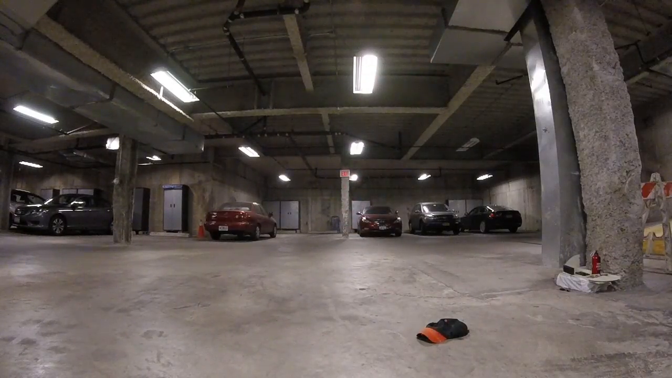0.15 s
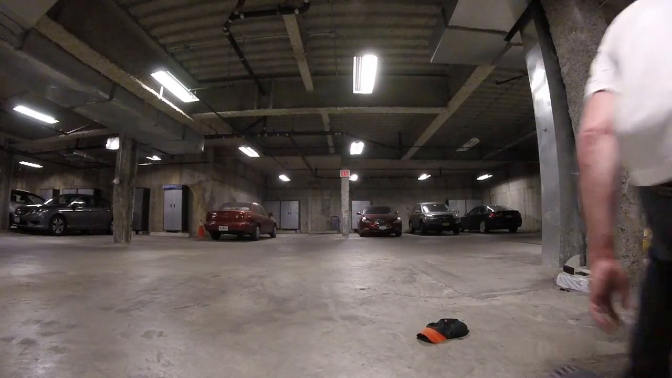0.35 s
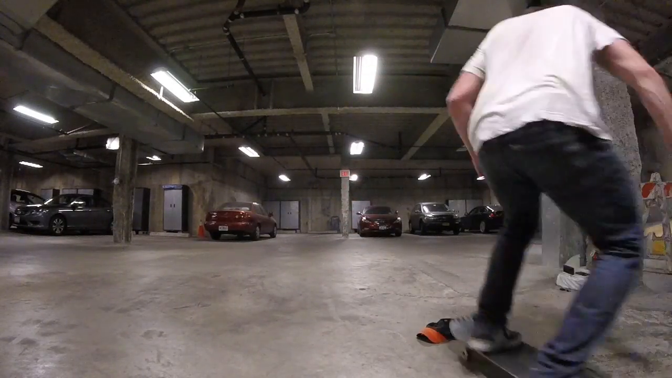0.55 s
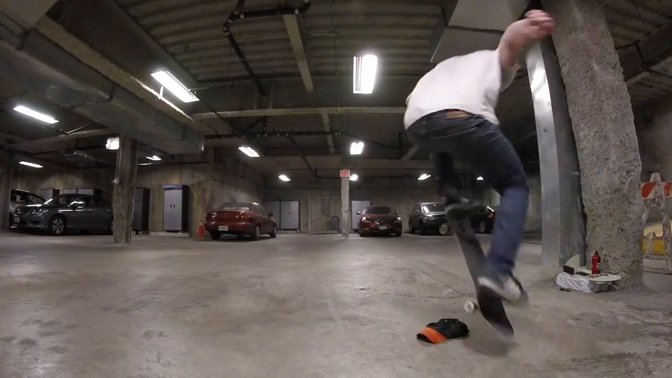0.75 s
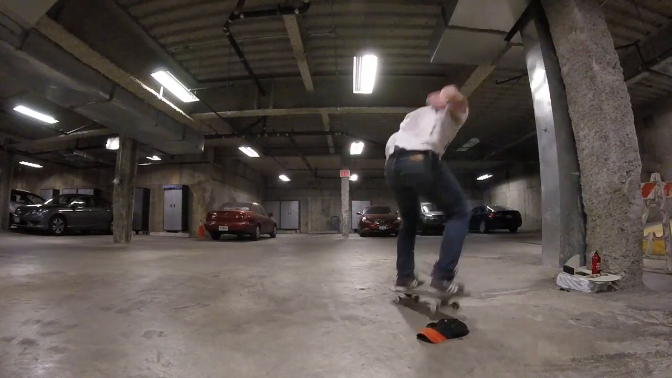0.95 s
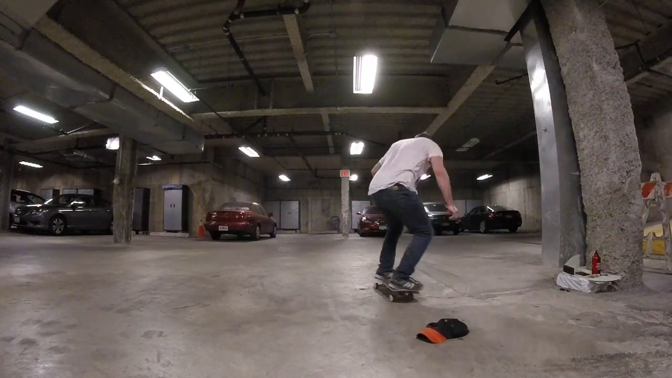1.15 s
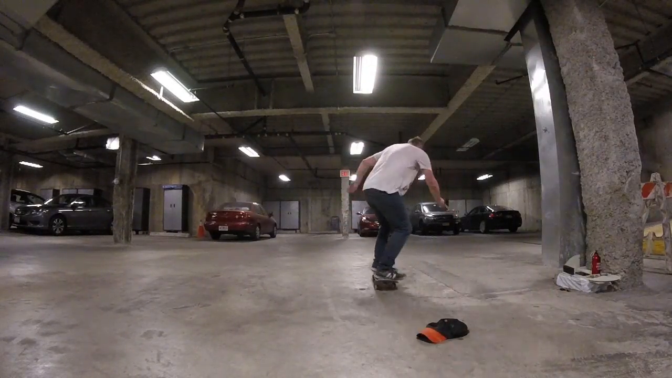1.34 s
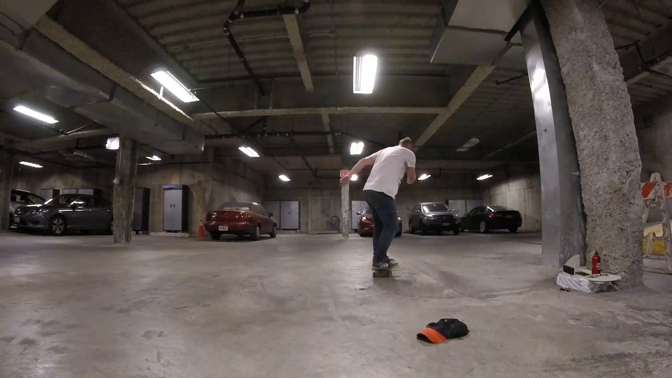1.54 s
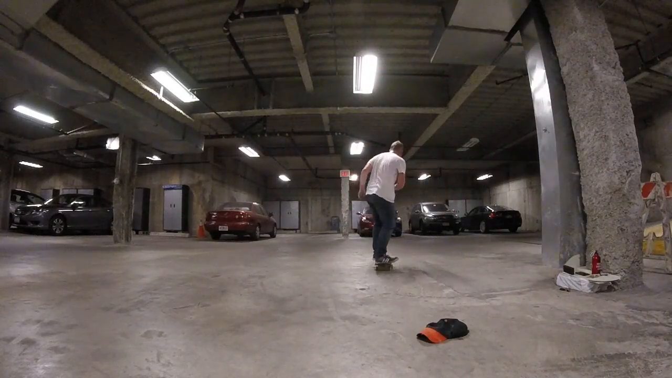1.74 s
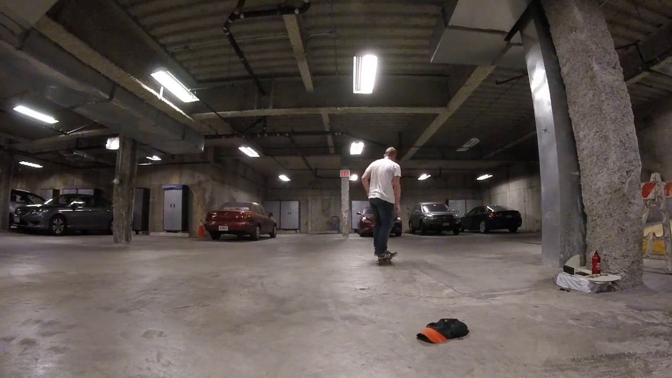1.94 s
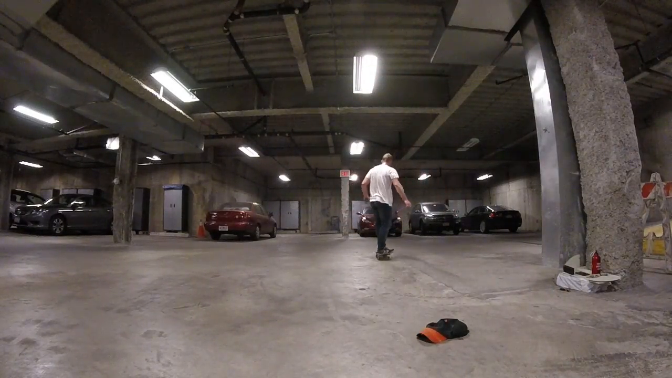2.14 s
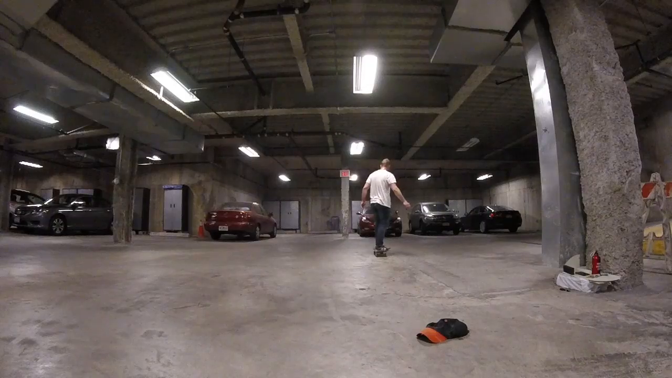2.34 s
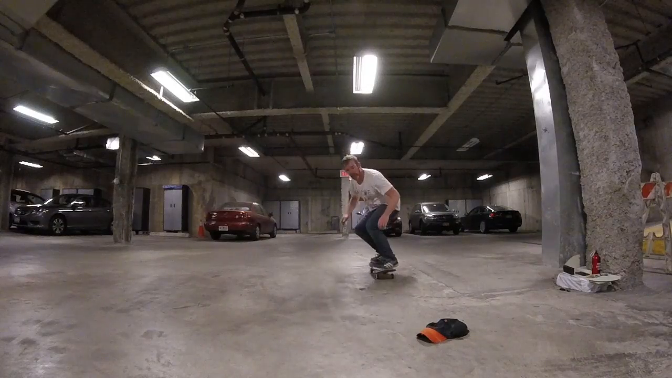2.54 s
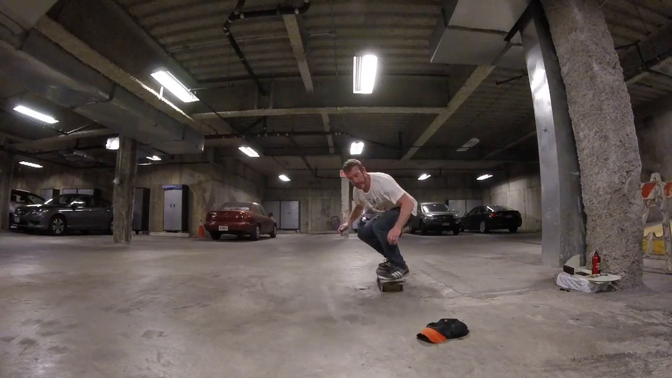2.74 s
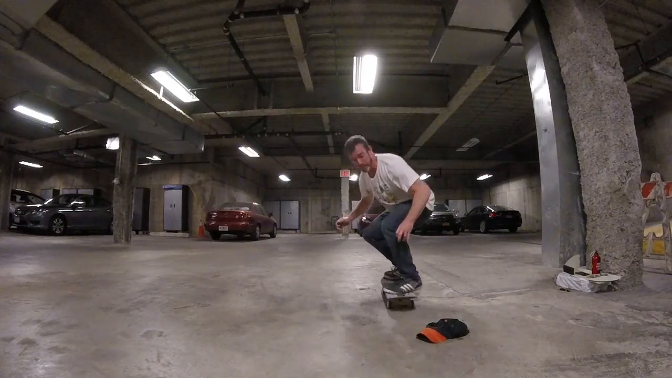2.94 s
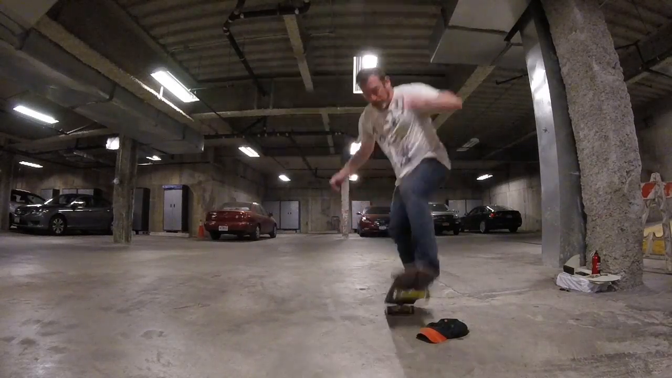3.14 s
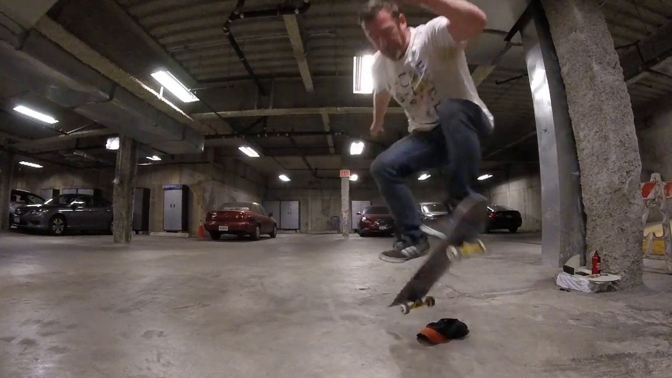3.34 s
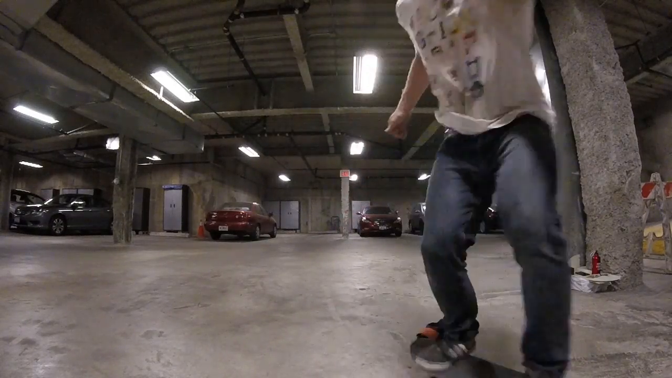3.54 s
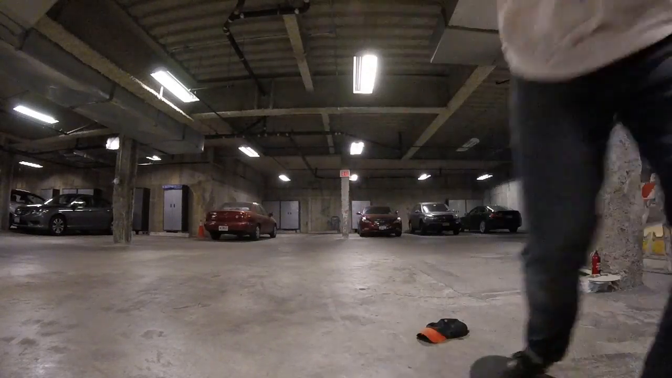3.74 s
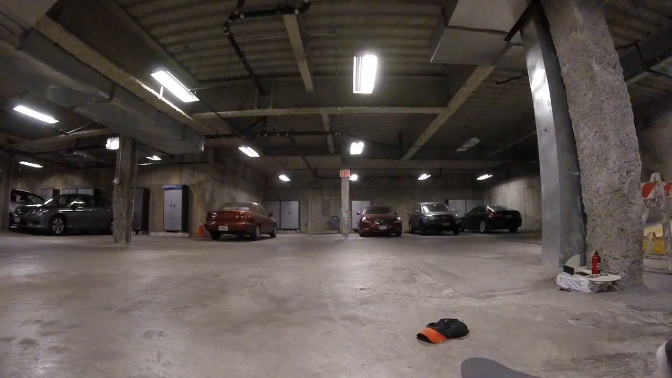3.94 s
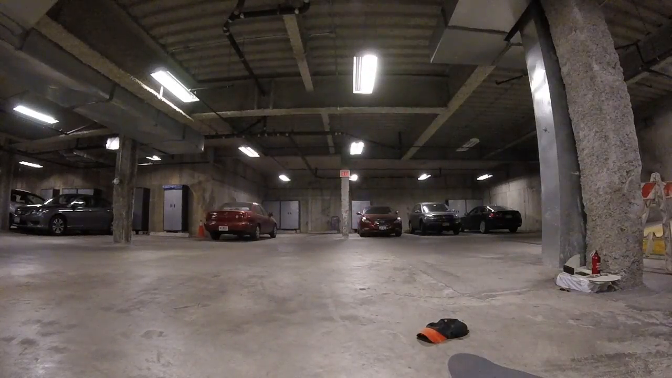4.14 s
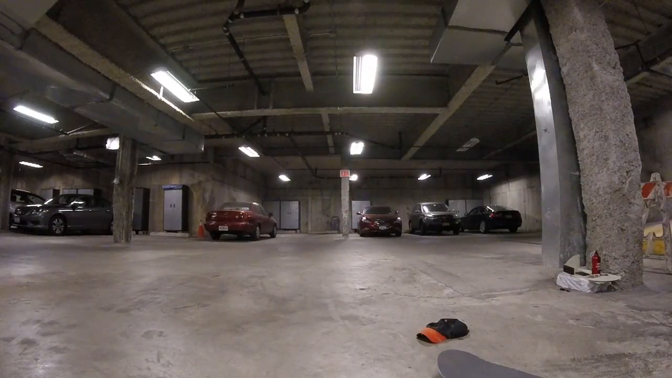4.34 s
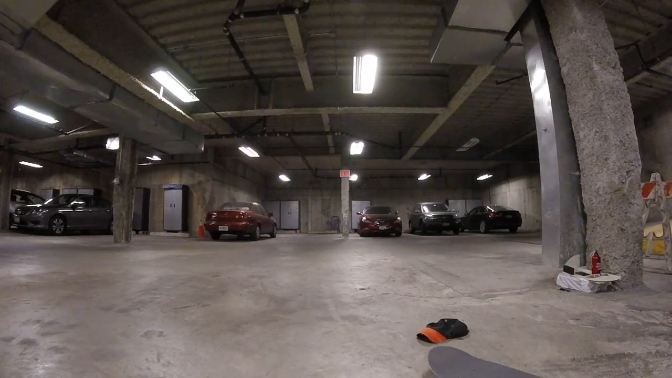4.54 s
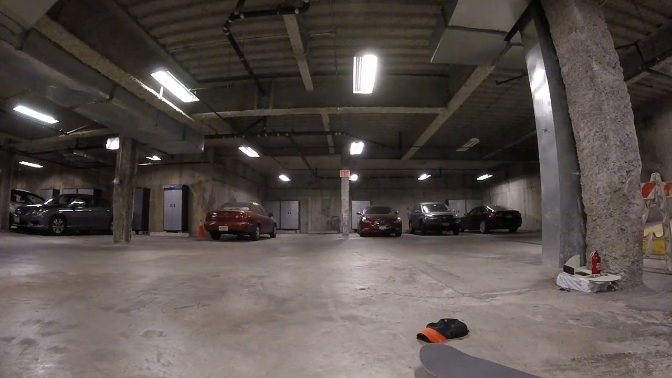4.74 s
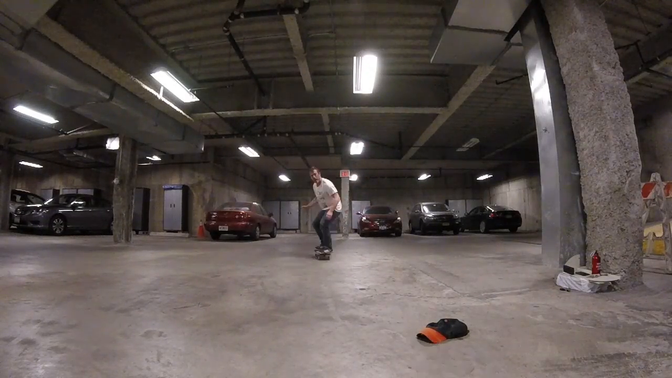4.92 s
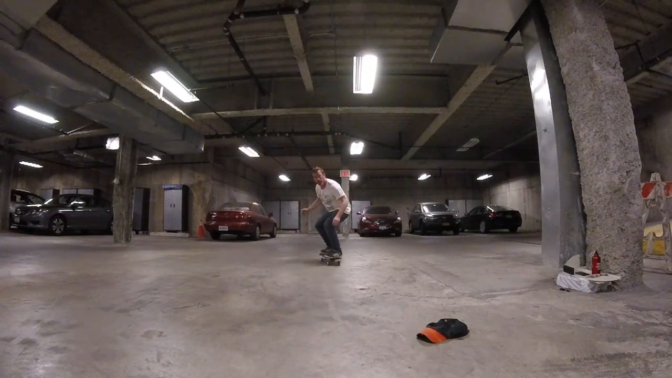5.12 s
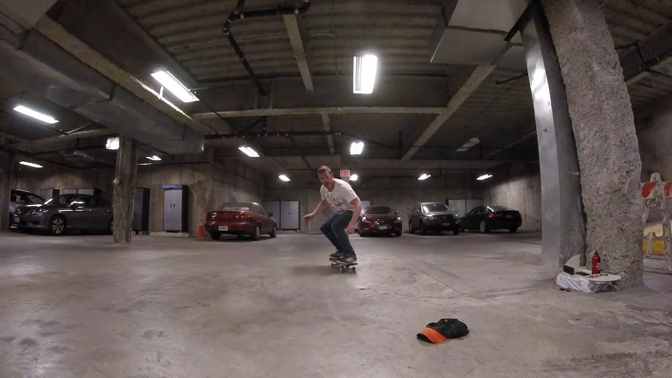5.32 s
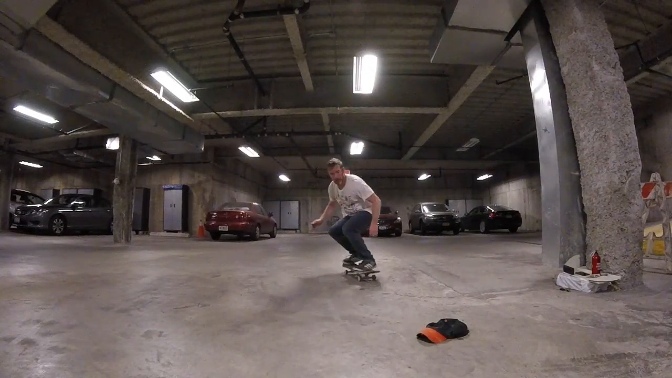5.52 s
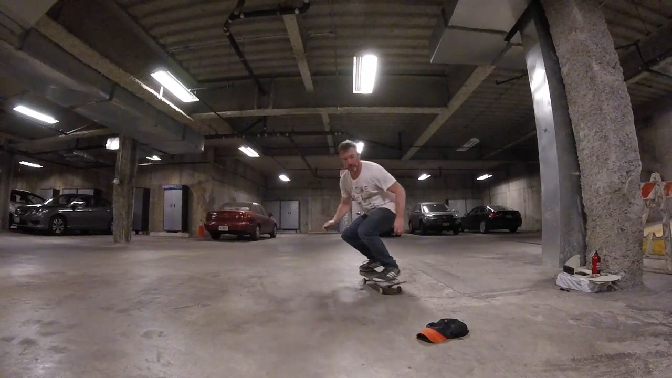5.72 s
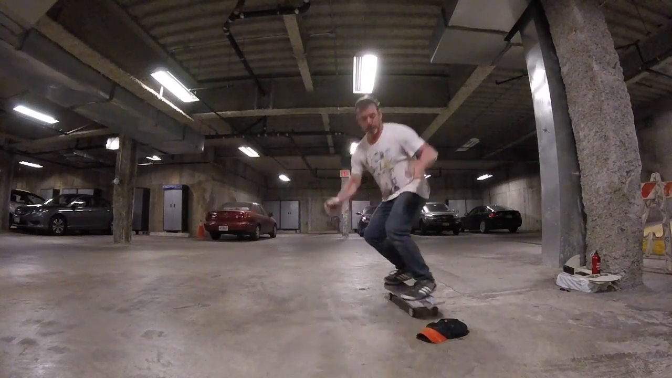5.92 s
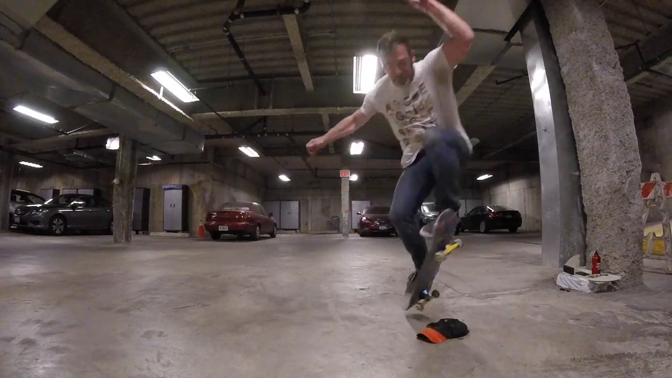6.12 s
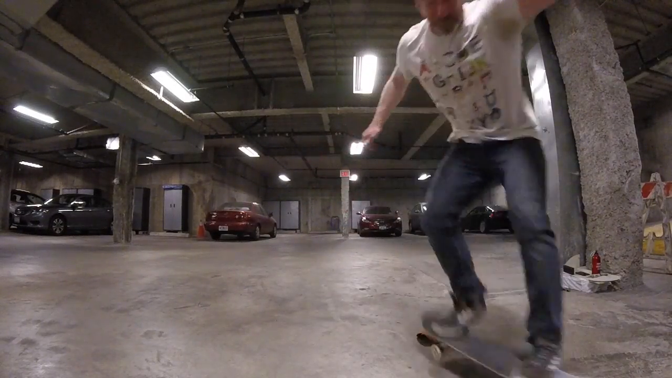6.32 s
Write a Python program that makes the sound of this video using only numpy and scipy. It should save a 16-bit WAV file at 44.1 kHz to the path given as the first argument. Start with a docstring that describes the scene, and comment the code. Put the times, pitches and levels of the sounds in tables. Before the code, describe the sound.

Three skateboard passes in a reverberant parking garage: gritty rolling, a hard pop, a short airborne gap, then a hollow slapping landing.

```python
"""An underground garage with a concrete floor, where a skateboarder makes three passes.
Each run-up is grains of concrete shaking the board's modes, with a hiss that grows; the tail then cracks
and the board lands in a cluster of blows, all short filtered clicks ringing in wood.
In between, filtered noise makes the wheels roll, judder and slide far away, with knocks, rasps and squeals.
Decaying noise bands and a few resonances are the garage's echo; soft noise and two tones are its fans."""
import sys
import numpy as np
from scipy import signal
from scipy.io import wavfile

SR = 44100
rng = np.random.default_rng(int(sys.argv[2]) if len(sys.argv) > 2 else 0)


def waveform_to_disk(signal):
    """Save audio, clipped to [-1, 1], as 16-bit WAV at the path in sys.argv[1]."""
    frames = np.transpose(np.atleast_2d(signal))
    scaled = np.clip(frames, -1, 1) * 32767
    samples = np.round(scaled).astype(np.int16)
    wavfile.write(sys.argv[1], SR, samples)


N = 285327
TIME = np.arange(N) / SR


def amp(db):
    """Decibels to gain."""
    return 10 ** (np.asarray(db) / 20)


def unit(x):
    """Scales to an rms of one."""
    return x / np.sqrt(np.mean(x ** 2) + 1e-20)


def read(points, hz):
    """Reads a table on a log-frequency axis."""
    f, value = np.transpose(points)
    return np.interp(np.log(hz + 1), np.log(f), value)


def add(mix, s, sound):
    """Mixes a sound in at a time in seconds."""
    part = mix[max(round(s * SR), 0):][:len(sound)]
    part += sound[:len(part)]


def gate(start, end, rise_s, release_s):
    """Straight attack, hold and exponential release."""
    attack = np.clip((TIME - start) / rise_s, 0, 1)
    return attack * np.exp(-np.maximum(TIME - end, 0) / release_s)


def wander(per_s):
    """A random curve of rms one, drawn as straight lines between new values."""
    return unit(np.interp(TIME * per_s, np.arange(4096), rng.standard_normal(4096)))


def colour(x, spectrum, peak_hz=1000, peak_db=0, octaves=0.41, size=2048):
    """Minimum-phase filter with a given spectrum and one bell-shaped hump."""
    hz = abs(np.fft.fftfreq(size, 1 / SR))
    distance = np.log2((hz + 1) / peak_hz) / octaves
    db = read(spectrum, hz) + peak_db * np.exp(-.5 * distance ** 2)
    # the Hilbert transform of the log gain gives the phase that makes the filter causal
    response = np.exp(np.conj(signal.hilbert(np.log(amp(db)))))
    taps = np.fft.ifft(response).real
    return signal.oaconvolve(x, taps[:size // 2])[:len(x)]


def resonate(x, hz, width):
    """One resonance with a gain of one at its peak."""
    return signal.lfilter(*signal.iirpeak(hz, hz / width, fs=SR), x)


def sweep(x, hz, width):
    """A resonance whose pitch follows a curve: shift down to zero, smooth, shift back up."""
    turn = np.exp(2j * np.pi * np.cumsum(hz) / SR)
    r = np.exp(-np.pi * width / SR)
    return 2 * (turn * signal.lfilter([1 - r], [1, -r], x / turn)).real


def ringing(modes, size=8192):
    """The board's answer to one click: it passes the force on and rings in its modes."""
    click = signal.unit_impulse(size)
    ring = click.copy()
    for hz, db, t60 in modes:
        ring += amp(db) * resonate(click, hz, np.log(1000) / np.pi / t60)
    return ring / np.linalg.norm(ring)


# Modes of the whole board. Each row: pitch in Hz, filter gain in dB, t60 in seconds.
DECK = [(143.1, 4.5, 0.13), (218, -1.5, 0.03), (274, -2, 0.21), (321, 0.5, 0.3), (380, -7, .04),
        (535.7, 0, 0.09), (592.2, 4.5, 0.07), (690, -1.5, 0.069), (873, -4, 0.44), (1085, -3.5, .09),
        (1158, 2.5, 0.13), (1199, -2.5, 0.06), (1330, -5.5, 0.061), (1764, -9.5, 0.019),
        (2230, -6.5, 0.051)]


def on_deck(force, modes=DECK):
    """A force heard through the board, which colours it with its modes."""
    return signal.oaconvolve(force, ringing(modes))[:N]


def blow(spectrum, chatter, settle_s, peak_hz=1000, peak_db=0, size=2048):
    """One contact and the chatter after it, with the energy of 10 ms at an rms of one."""
    t = np.arange(size) / SR
    rattle = rng.standard_normal(size) * np.exp(-t / settle_s)
    rattle /= np.linalg.norm(rattle)
    chatter = np.clip(chatter, 0, 1)  # share of the energy
    force = np.sqrt(1 - chatter) * (t == 0) + np.sqrt(chatter) * rattle
    force = colour(force, spectrum, peak_hz, peak_db)
    return force / np.linalg.norm(force) * np.sqrt(SR / 100)


# Modes of the tail's bare wood. Each row: pitch in Hz, filter gain in dB, t60 in seconds.
TAIL = [(600, -3.5, .04), (800, -3.5, 0.015), (1498, 2.5, .035), (1680, -4.5, 0.052), (2070, -2.5, 0.017),
        (2700, 1.5, 0.015), (2955, -8.5, .04), (3465, 0.5, 0.021), (3980, -0.5, 0.0093), (6770, -7, .015)]
# Contact spectra of dull thuds, hard cracks and lighter taps. Each row: frequency in Hz, relative level in dB.
THUD = [(40, -42.5), (90, -31), (170, -16.5), (300, -2), (600, -1.5), (1000, -5.5), (1300, -7.5),
        (1700, -18.5), (3000, -21), (5000, -33), (7000, -30.5), (10000, -42), (14000, -62.5)]
CRACK = [(60, -51), (200, -36), (400, -9), (1000, -2), (1800, -0.5), (3500, -6), (4400, -7), (5300, -14),
         (6600, -14), (7300, -23.5), (8300, -22), (9500, -37), (11300, -36.5), (13000, -60), (14500, -70)]
TAP = [(60, -50), (200, -34), (400, -9.5), (1000, -4), (1800, -0.5), (3500, -4.5), (4400, -8), (5300, -15),
       (6600, -14.5), (7400, -28.5), (9500, -45), (14000, -66)]
# Tail on concrete. Each row: start in seconds, crack and thud level in dB ahead of the trims, brightest
# pitch in Hz, its hump in dB, chatter from 0 to 1 ahead of scaling, chatter decay in seconds, extra echo in dB.
POPS = [(0.6048, -26, -39, 3500, 12, 0.47, 0.0022, 1), (3.1017, -25, -48.5, 2100, 4.5, 0.77, 0.003, 0),
        (5.98, -23, -39.5, 3080, 6, 0.98, 0.0065, 1)]
# Clatter of each landing, as wheels touch, the deck slaps and the feet come down.
# Each row: start in seconds, thud and crack level in dB ahead of the trim, thud and crack hump in Hz.
BLOWS = [(0.9173, -21, -31, 800, 1900), (0.9214, -19, -30, 600, 6400), (0.9323, -24, -18.5, 800, 3050),
         (0.9414, -21, -29, 900, 2200), (.945, -19.5, -31, 1198, 3020), (0.9494, -23, -42.5, 649, 2005),
         (0.953, -19.5, -39, 650, 1997), (.959, -21.5, -42.5, 832, 1500), (3.3907, -23.5, -28.5, 655, 1906),
         (3.3942, -26.5, -25.5, 810, 1996), (3.3984, -20, -24, 655, 1887),
         (3.4056, -25.5, -26.5, 700, 6000), (3.4146, -19, -46.5, 600, 2000), (3.418, -22, -45, 650, 1998),
         (3.4255, -19, -22.5, 1200, 6330), (3.4298, -22, -24, 544, 2940), (3.437, -26, -40.5, 600, 1513),
         (6.2276, -18.5, -24, 700, 1910), (6.2326, -16, -19.5, 705, 1990),
         (6.2431, -20.5, -24.5, 644, 2200), (6.248, -16.5, -24.5, 550, 1880),
         (6.2525, -20.5, -34.5, 640, 2010), (6.265, -26, -33, 893, 6400), (6.2702, -14.5, -21, 1144, 2460),
         (6.2777, -18.5, -36, 400, 6460), (6.285, -24.5, -52, 495, 1500)]
TAIL_TRIM_DB, LANDING_TRIM_DB, KNOCK_TRIM_DB = 1.0, -5.5, -7.0


def strikes(small, rattle, in_echo):
    """Tail pops, landings and knocks: a dull thud through the wheels, a crack from bare wood and metal."""
    tail, pops, landings, knocks = np.zeros((4, N))
    for s, crack_db, thud_db, hz, hump_db, chatter, settle_s, echo_db in POPS:
        crack = blow(CRACK, rattle * chatter, settle_s, hz, hump_db)
        add(tail, s, amp(crack_db + in_echo * echo_db) * crack)
        add(pops, s, amp(thud_db) * blow(THUD, chatter=0.21 * rattle, settle_s=0.0043))
    for s, thud_db, crack_db, thud_hz, crack_hz in BLOWS:
        thud = blow(THUD, chatter=0.6 * rattle, settle_s=0.006, peak_hz=thud_hz, peak_db=4.0)
        crack = blow(CRACK, chatter=1.072 * rattle, settle_s=0.0025, peak_hz=crack_hz, peak_db=6.5)
        add(landings, s, amp(thud_db) * thud)
        add(landings, s, amp(crack_db) * crack)
    for s, thud_db, crack_db, hz in small:
        thud = blow(THUD, chatter=.9 * rattle, settle_s=0.015, peak_hz=400, peak_db=8)
        tap = blow(TAP, chatter=0.72 * rattle, settle_s=0.0025, peak_hz=hz, peak_db=9.5)
        add(knocks, s, amp(thud_db) * thud)
        add(knocks, s, amp(crack_db) * tap)
    hits = amp(TAIL_TRIM_DB) * on_deck(tail, TAIL) + on_deck(pops + amp(LANDING_TRIM_DB) * landings)
    return hits, on_deck(amp(KNOCK_TRIM_DB) * knocks)


# The front of the board slapping down. Each row: start in seconds, level in dB, pitch in Hz.
SLAPS = [(0.947, -28, 1117), (1.511, -52, 1436), (3.4218, -16, 1230), (6.2693, -29, 1220)]
SLAP_SWELL_S = 0.0027


def slaps():
    """The front of the board comes down with a hollow clonk, a short swelling and dying sine."""
    out, t = np.zeros(N), np.arange(SR // 8) / SR
    swell = t / SLAP_SWELL_S
    for s, db, hz in SLAPS:
        add(out, s, amp(db) * np.sin(2 * np.pi * hz * t) * swell * np.exp(1 - swell))
    return out


# The board coming down. Each row: start in seconds, deck flex, floor thump and rolling-on rumble level in dB,
# the rumble's boom hump in dB, the rumble's hold in seconds.
LANDINGS = [(0.9173, -57.5, -48.5, -40.5, 3.5, 0.1417), (3.3913, -31.5, -55, -39.5, 7.5, 0.15),
            (6.228, -32.5, -53.5, -40.5, 6, 0.13)]
# Soft low thumps as the rider's weight shifts.
# Each row: start in seconds, level in dB, pitch in Hz, swell in seconds.
BUMPS = [(0.102, -45, 141, 0.016), (2.555, -51.5, 171, 0.0089), (2.733, -38, 196.2, 0.0038),
         (4.326, -39.5, 217, 0.0032), (4.324, -55, 50, 0.0091), (4.334, -47, 120, 0.0053),
         (4.338, -44, 253.5, 0.0082), (5.139, -37, 178, 0.0073), (5.309, -42.5, 157, 0.0107),
         (5.701, -37, 150, 0.012), (5.755, -40, 170, 0.0098), (5.804, -45, 165, 0.0114)]
# the feet land this long after the wheels; a landing flexes the deck and thumps the floor
FOOT_S, FLEX_HZ, THUMP_HZ, FLEX_SWELL_S = 0.026, 150, 81, 0.012


def bumps():
    """The rider's weight flexes the board, in each landing and when he shifts: a few low cycles."""
    out, t = np.zeros(N), np.arange(SR // 8) / SR
    landed = []
    for s, flex_db, thump_db, *_ in LANDINGS:
        landed.append((s + FOOT_S, flex_db, FLEX_HZ, FLEX_SWELL_S))
        landed.append((s + FOOT_S, thump_db, THUMP_HZ, FLEX_SWELL_S))
    for s, db, hz, swell_s in BUMPS + landed:
        swell = t / swell_s
        add(out, s, amp(db) * np.sin(2 * np.pi * hz * t) * swell ** 2 * np.exp(2 * (1 - swell)))
    return out


def grains(per_s, spread_db):
    """Wheels meeting grains of concrete of unequal size, at random instants."""
    sizes = amp(spread_db * np.minimum(rng.exponential(1, N), 5))
    met = rng.random(N) < per_s / SR
    return unit(rng.standard_normal(N) * sizes * met)


# Growl of the four wheels. Each entry: one wheel's centre pitch in Hz.
WHEEL_HZ = [342, 510, 793, 1700]
# each wheel swells on its own (dB rms)
WHEEL_GROWL_DB, WHEEL_SWELL_DB, WHEEL_SWELLS_PER_S = 9.5, 2.5, 55
# the growl drifts in pitch (octaves rms) as the load shifts
GROWL_DRIFT, GROWL_DRIFTS_PER_S = 0.16, 22


def four_wheels():
    """Four wheels meet their own grains of concrete and shake the one board."""
    force = np.zeros(N)
    for hz in WHEEL_HZ:
        ground = grains(per_s=1200, spread_db=1.1)
        pitch = hz * 2 ** (GROWL_DRIFT * wander(per_s=GROWL_DRIFTS_PER_S))
        growl = sweep(ground, pitch, width=0.23 * hz)
        swell = amp(WHEEL_SWELL_DB * wander(per_s=WHEEL_SWELLS_PER_S))
        force += (ground + amp(WHEEL_GROWL_DB) * growl) * swell
    return on_deck(force)


# Spectra of the wheels' low rumble and bright hiss. Each row: frequency in Hz, relative level in dB.
GRIT = [(40, -31.5), (90, -20), (140, -10.5), (200, -8.5), (380, -3), (560, -3), (800, -6.5), (950, -11.5),
        (1700, -12.5), (2500, -20.5), (5000, -47), (11000, -76)]
FIZZ = [(500, -25.5), (1700, 2), (3600, -6), (5000, -9.5), (7000, -18), (9800, -29.5), (13000, -28.5),
        (15000, -47)]
# Run-ups. Each row: start and end in seconds, rumble level and its growth in dB, hiss level and its
# growth in dB, boom hump in dB, middle band in dB, fade-in and fade-out time in seconds.
PASSES = [(0.089, 0.552, -38, -2, -54.5, 11, -3.5, -9, 0.004, 0.1),
          (2.445, 3.044, -49, 7, -61.5, 17, -3, -1, 0.057, 0.018),
          (4.988, 5.927, -46, 8, -62, 9, 6.5, -22, 0.011, 0.054)]
# dip in level at both ends of a run-up (dB)
END_DIP_DB = -5.5
# the rumble has one broad middle band
MIDDLE_HZ, MIDDLE_WIDTH_HZ = 1075, 1100
# loose grit scrapes under the wheels in a wandering band (drift in octaves rms)
SCRAPE_HZ, SCRAPE_DRIFT, SCRAPE_WIDTH_HZ, SCRAPE_DB = 3440, 0.55, 600, -3


def rolling():
    """Rough concrete shakes the board; the rolling starts abruptly, and dips and stops just before each pop."""
    out, pressure = np.zeros(N), wander(per_s=100)
    bumping = four_wheels() * amp(0.74 * pressure)
    grit = grains(per_s=3900, spread_db=-0.5)
    scrape_pitch = SCRAPE_HZ * 2 ** (SCRAPE_DRIFT * wander(per_s=30))
    scrape = sweep(grit, scrape_pitch, SCRAPE_WIDTH_HZ) * amp(SCRAPE_DB + 4.3 * wander(per_s=35))
    hiss = unit(on_deck(colour(grit + scrape, FIZZ)) * amp(1.6 * pressure))
    for (start, end, rumble_db, rumble_growth_db, hiss_db, hiss_growth_db,
         boom_db, middle_db, fade_in_s, fade_out_s) in PASSES:
        edges = np.clip(np.minimum(TIME - start, end - TIME) / 0.0022 + 1, 0, 1)
        on = edges > 0
        since, left = TIME[on] - start, end - TIME[on]
        near = since / (end - start)
        dip = np.clip(1 - np.minimum(since / fade_in_s, left / fade_out_s), 0, 1)
        level = edges[on] * amp(END_DIP_DB * dip)
        rumble = colour(bumping[on], GRIT, peak_hz=165, peak_db=boom_db, octaves=0.84)
        rumble = unit(rumble + amp(middle_db) * resonate(rumble, MIDDLE_HZ, MIDDLE_WIDTH_HZ))
        low = rumble * amp(rumble_db + rumble_growth_db * near)
        high = hiss[on] * amp(hiss_db + hiss_growth_db * near ** 2)
        out[on] += level * (low + high)
    return out


# Coarse patches of floor under the wheels.
# Each row: centre in seconds, level in dB, strongest pitch in Hz, half length in seconds.
PATCHES = [(0.133, -48, 700, 0.022), (0.187, -41, 576, .012), (1.008, -34, 520, 0.016),
           (1.099, -40, 560, 0.015), (1.182, -44.5, 1050, 0.0253), (1.356, -52, 990, 0.019),
           (1.85, -52, 497, .014), (1.918, -52.5, 613, .014), (1.952, -53.5, 479.3, 0.0165),
           (2.472, -43.5, 379, 0.017), (2.549, -41.5, 433, 0.021), (2.64, -42, 575, 0.027),
           (2.941, -40.5, 1150, 0.024), (3.018, -42, 1250, 0.016), (3.717, -47, 380, 0.013),
           (5.015, -43, 400, 0.023), (5.156, -34, 350, .008), (5.296, -35, 358, 0.016),
           (5.388, -41, 424, 0.045), (5.713, -32, 465, .007), (5.738, -35, 600, 0.0086),
           (5.768, -36.5, 262, 0.029), (5.844, -39, 560, .018)]
PATCH_HUMP_DB = 12


def rough_patches():
    """The wheels cross coarse patches of floor: short lumpy swells in the rumble."""
    out, bumping = np.zeros(N), four_wheels()
    for s, db, hz, half_s in PATCHES:
        near = abs(TIME - s) < .15
        rumble = unit(colour(bumping[near], GRIT, peak_hz=hz, peak_db=PATCH_HUMP_DB, octaves=.4))
        out[near] += amp(db) * rumble * np.exp(-((TIME[near] - s) / half_s) ** 2)
    return out


# Shoes on the deck, rattling trucks and pits in the floor.
# Each row: start in seconds, thud and crack level in dB ahead of the knock trim, brightest pitch in Hz.
KNOCKS = [(.096, -35, -48, 1700), (.4095, -39, -38, 1710), (0.434, -44, -29, 3500),
          (0.446, -58.5, -42, 3000), (0.5296, -53, -40, 3300), (0.545, -65.5, -42, 2200),
          (.62, -40.5, -38, 1990), (0.64, -42.5, -47, 3520), (0.664, -69, -42, 1933),
          (0.7097, -66.5, -41.5, 3500), (.759, -64.5, -42, 1125), (0.835, -68.5, -51.5, 3570),
          (0.87, -61, -51, 1697), (1.1, -44, -66.5, 1200), (1.16, -54.5, -52.5, 1984),
          (1.345, -53, -65, 1100), (1.512, -64, -58, 1900), (1.891, -46.5, -79, 1500),
          (2.029, -53.5, -76, 1500), (2.453, -38.5, -54, 1790), (2.50, -43.5, -69.5, 1780),
          (2.716, -33, -49.5, 2000), (2.929, -36.5, -39.5, 2200), (3.006, -51, -40, 3800),
          (3.111, -41, -29.5, 2400), (3.138, -36, -28, 2200), (3.255, -66.5, -42, 1860),
          (3.565, -42, -46.5, 4125), (3.595, -44.5, -44.5, 2770), (3.896, -50, -36.5, 1370),
          (3.908, -34, -45, 1510), (4.328, -48.5, -40.5, 2330), (5.14, -32, -47.5, 4709),
          (5.212, -33, -42, 3340), (5.277, -30.5, -47.5, 3220), (5.288, -33.5, -62, 2000),
          (5.398, -52.5, -61.5, 3540), (5.696, -45, -50.5, 5000), (5.707, -27, -43, 4500),
          (5.892, -37, -41, 2580), (5.993, -37.5, -33.5, 2790), (6.041, -61, -36.5, 2584),
          (6.086, -64, -40, 3030), (6.134, -80.5, -40, 1500)]
# A worn spot on a wheel knocks once a turn in the last run-up.
# Each entry: crack level of one turn in dB ahead of the knock trim.
FLAT_CRACKS_DB = [-46.5, -41, -37.5, -51]
FLAT_START_S, WHEEL_TURN_S, FLAT_THUD_DB, FLAT_HZ = 5.5105, .052, -27.5, 6000
# shoes tick on the flying board, ever more faintly: longest gap, level at the pop, fade, thud, brightest pitch
TICK_GAP_S, TICK_DB, TICK_FADE_DB_PER_S, TICK_THUD_DB, TICK_HZ = 0.045, -34.5, 78.5, -61.5, 2200


def small_blows(tick_count=2):
    """Lists the single knocks, the worn wheel's turns and chance ticks in the air, as rows like KNOCKS."""
    worn = []
    for k, db in enumerate(FLAT_CRACKS_DB):
        worn.append((FLAT_START_S + k * WHEEL_TURN_S, FLAT_THUD_DB, db, FLAT_HZ))
    ticks = []
    for pop in POPS:
        gaps = TICK_GAP_S * (.5 + .5 * rng.random(tick_count))
        for delay in np.cumsum(gaps):
            ticks.append((pop[0] + delay, TICK_THUD_DB, TICK_DB - TICK_FADE_DB_PER_S * delay, TICK_HZ))
    return worn + ticks + KNOCKS


# Short swells of rasping noise, some as scuffs and some within the rolling hiss.
# Each row: centre in seconds, level in dB, half length in seconds, brightest pitch in Hz.
RASPS = [(.01, -70.5, 0.0325, 3000), (0.643, -45, 0.013, 3500), (0.897, -59.5, 0.038, 2960),
         (1.171, -61.5, 0.0099, 4057), (2.768, -52.5, .025, 3500), (3.489, -46.5, 0.0101, 1900),
         (3.513, -46, 0.0112, 2700), (3.686, -51.5, 0.011, 2950), (3.771, -62, 0.0088, 3300),
         (3.817, -70.5, 0.017, 6958), (3.858, -68, 0.01, 6000), (3.934, -55.5, 0.0142, 3210),
         (3.974, -71, 0.0145, 3530), (5.553, -51, 0.039, 2200), (5.644, -49, 0.034, 3470),
         (5.715, -53.5, 0.021, 5000), (6.088, -53, .015, 2700), (6.342, -48, .012, 2000),
         (6.363, -47.5, 0.01, 3470), (6.382, -49, .008, 6400), (6.441, -51, 0.0206, 2700)]
# Their colour. Each row: frequency in Hz, relative level in dB.
RASP_COLOUR = [(500, -15.5), (1200, -3.5), (2200, 5.5), (4000, -1), (5500, -7.5), (7000, -11.5),
               (8200, -16), (10000, -36), (14000, -50)]


def rasps():
    """Short rasping swells, each a bell-shaped burst of coloured random grains."""
    out, grit = np.zeros(N), grains(per_s=2500, spread_db=2.0)
    for s, db, half_s, hz in RASPS:
        near = abs(TIME - s) < .1
        rasp = unit(colour(grit[near], RASP_COLOUR, peak_hz=hz, peak_db=8, octaves=0.58))
        out[near] += amp(db) * rasp * np.exp(-((TIME[near] - s) / half_s) ** 2)
    return out


# Hiss of wheels sliding sideways. Each row: frequency in Hz, relative level in dB.
SLIDE = [(1200, -21), (2200, 0), (4000, 2.5), (5200, -5), (7000, -9.5), (10000, -23.5), (14000, -31.5)]
SLIDE_START_S, SLIDE_END_S, SLIDE_DB, SLIDE_RISE_S, SLIDE_RELEASE_S = 4.783, 4.98, -56, 0.015, 0.0027
# Urethane, shoe rubber and a dry bearing squealing. Each row: start and end in seconds, level in dB, pitch in Hz,
# glide in octaves, width of each filter pass as a share of the pitch, release in seconds.
SQUEALS = [(0.501, 0.525, -46, 2830, -0.18, 0.16, .008), (0.705, 0.725, -45, 1820, -0.15, 0.24, 0.0058),
           (4.942, 4.977, -55.5, 1510, -0.25, 0.145, 0.0079),
           (5.761, 5.868, -67.5, 6400, -0.054, 0.097, 0.013)]
# a squeal starts quickly, fades, wavers in pitch (octaves rms) and has a faint overtone
SQUEAL_RISE_S, SQUEAL_FADE_DB_PER_S, SQUEAL_WAVER, OVERTONE_DB = .005, 40.5, 0.033, -23
# the rubber grabs and lets go in quick pulses
GRABS_PER_S, GRAB_DB = 40, 1.5


def skids():
    """Rubber sticks and slips: fuzzy, gliding squeals, a hiss in the slide."""
    noise = rng.standard_normal(N)
    hiss = colour(noise, SLIDE, peak_hz=6400, peak_db=5.5, octaves=.12) * amp(0.49 * wander(per_s=79))
    out = amp(SLIDE_DB) * unit(hiss) * gate(SLIDE_START_S, SLIDE_END_S, SLIDE_RISE_S, SLIDE_RELEASE_S)
    slip = rng.standard_normal(N)
    uneven_db, waver = 2.0 * wander(per_s=46), SQUEAL_WAVER * wander(per_s=53)
    for start, end, db, hz, glide, share, release_s in SQUEALS:
        on = (TIME > start) & (TIME < end + 6 * release_s)
        age = TIME[on] - start
        pitch = hz * 2 ** (glide * np.minimum(age / (end - start), 1) + waver[on])
        width = share * hz
        # two passes through the gliding filter
        tone = unit(sweep(sweep(slip[on], pitch, width), pitch, width))
        overtone = unit(sweep(sweep(slip[on], 2 * pitch, width), 2 * pitch, width))
        grip_db = uneven_db[on] + GRAB_DB * np.sin(2 * np.pi * GRABS_PER_S * age)
        level = amp(db + grip_db - SQUEAL_FADE_DB_PER_S * age)
        shape = gate(start, end, SQUEAL_RISE_S, release_s)[on]
        out[on] += (tone + amp(OVERTONE_DB) * overtone) * level * shape
    return out


# Wheels hopping sideways in the far turns. Each row: start and end in seconds, level in dB ahead of the hops,
# pitch in Hz, hump width in octaves, hops per second.
JUDDERS = [(1.409, 1.486, -69.5, 3600, 0.17, 42), (1.62, 1.775, -65.5, 3280, 0.21, 38),
           (2.129, 2.252, -61, 3027, .23, 37), (4.335, 4.444, -58.5, 2946, 0.39, 42.5)]
# Their rasp. Each row: frequency in Hz, relative level in dB.
JUDDER = [(300, -16.5), (1500, -4), (3500, 0.5), (4500, -2.5), (6500, -8), (10000, -25)]
# the gain left between hops, and the share of a hop spent slipping
JUDDER_GRIP, JUDDER_SLIP_SHARE = 0.13, 0.27


def judders():
    """Far away the wheels hop sideways in a turn: a quick train of rasping chirps."""
    out = np.zeros(N)
    for start, end, db, hz, octaves, per_s in JUDDERS:
        age = np.maximum(TIME - start, 0)
        noise = rng.standard_normal(N)
        rasp = unit(colour(noise, JUDDER, peak_hz=hz, peak_db=22.5, octaves=octaves))
        grip = JUDDER_GRIP + np.exp(-(age * per_s % 1) / JUDDER_SLIP_SHARE)
        out += amp(db) * rasp * grip * gate(start, end, rise_s=0.0022, release_s=0.013)
    return out


# Rumble of wheels moving away, behind the rider's legs. Each row: frequency in Hz, relative level in dB.
RECEDING = [(40, -30.5), (90, -14.5), (140, -13.5), (220, -6), (380, -1), (560, -2.5), (850, -3),
            (1300, -6), (1700, -19), (2500, -24.5), (5000, -39.5), (11000, -78)]
# Faint boomy rolling, at the opening and far off between the first two run-ups; one curve each.
# Each row: time in seconds, rumble level in dB ahead of FAINT_DB.
FAINT_ROLLING = [
    [(0.0, -53.5), (0.05, -56.5), (0.08, -64)],
    [(1.4, -68.5), (1.52, -61), (1.62, -63), (1.8, -58), (1.91, -59.5), (1.99, -57.5), (2.08, -60.5),
     (2.42, -62.5)],
]
FAINT_DB, FAINT_FADE_DB_PER_S = -2, 36
# after a landing the wheels rumble on, then recede
ROLL_ON_DELAY_S, RECEDE_DB_PER_S = 0.057, 77.5


def far_rolling():
    """The rumble receding after each landing, and faint rolling made boomy by the low ceiling."""
    bumping, (receding, faint) = four_wheels(), np.zeros((2, N))
    for s, *_, db, boom_db, hold_s in LANDINGS:
        age = TIME - s - ROLL_ON_DELAY_S
        rumble = unit(colour(bumping, RECEDING, peak_hz=149, peak_db=boom_db, octaves=0.63))
        receding += rumble * (age > 0) * amp(db - RECEDE_DB_PER_S * np.maximum(age - hold_s, 0))
    for curve in FAINT_ROLLING:
        s, db = np.transpose(curve)
        outside_s = abs(TIME - np.clip(TIME, s[0], s[-1]))
        faint += amp(FAINT_DB + np.interp(TIME, s, db) - FAINT_FADE_DB_PER_S * outside_s)
    return receding + faint * unit(colour(bumping, GRIT, peak_hz=141, peak_db=12.5, octaves=0.65))


# Resonances of the garage after a landing. Each row: pitch in Hz, level in dB, t60 in seconds.
AFTER_RING = [(279.4, -42, .7), (319, -34, .7), (593, -35.5, .7), (670, -40, 0.48), (850, -47, 0.4),
              (1141, -44.5, .6), (1157, -44, .65)]
# they build up, then waver in phase (radians rms) and level (dB rms)
RING_RISE_S, RING_WAVER, RING_SWELL_DB = .03, .7, 2.5


def after_ring():
    """Each landing leaves a few resonances of the garage ringing, unevenly."""
    out = np.zeros(N)
    for hz, db, t60 in AFTER_RING:
        level = np.zeros(N)
        for s, *_ in LANDINGS:
            age = np.maximum(TIME - s - FOOT_S, 0)
            level += np.minimum(age / RING_RISE_S, 1) * amp(db - 60 * age / t60)
        phase = 2 * np.pi * hz * TIME + RING_WAVER * wander(per_s=17)
        out += level * amp(RING_SWELL_DB * wander(per_s=25)) * np.sin(phase)
    return out


# Standing waves under the ceiling. Each row: pitch in Hz, width in Hz, gain in dB.
ROOM_MODES = [(84, 0.86, 14), (142.4, 2, 15)]


def standing_waves(pushes):
    """Heavy pushes set narrow low room modes swinging."""
    boom = np.zeros(N)
    for hz, width, db in ROOM_MODES:
        boom += amp(db) * resonate(pushes + 1e-12, hz, width)
    return boom


# Decay of the garage. Each row: frequency in Hz, t60 in seconds.
GARAGE_T60 = [(80, 2.5), (150, 1.26), (300, 0.52), (700, 0.61), (1500, 0.46), (3500, 0.65), (6500, 0.3171),
              (10000, 0.14), (13000, .24)]
# Strength of its echo. Each row: frequency in Hz, echo level in dB.
GARAGE_ECHO = [(80, -9), (150, -8), (300, -10), (700, -10), (1500, -9), (3500, -14), (6500, -13.5),
               (10000, -11.5)]


def garage(x, size=65536):
    """Dense reflections as random signs, each band dying at its own speed."""
    hz, t, z = signal.stft(rng.choice([-1., 1.], size), SR, nperseg=512)
    t60 = read(GARAGE_T60, hz)[:, None]
    # evens out the energy of short and long decays
    even = np.sqrt(2 * np.log(1000) / (t60 * SR))
    z = z * amp(read(GARAGE_ECHO, hz)[:, None] - 60 * t / t60) * even
    tail = signal.istft(z, SR, nperseg=512)[1][:size]
    tail = tail * (1 - np.exp(-np.arange(size) / SR / 0.0031))  # soft onset
    return signal.oaconvolve(x, tail)[:N]


# Fan noise. Each row: frequency in Hz, relative level in dB.
AIR = [(30, -15), (80, 1.5), (160, -4.5), (350, -5.5), (800, -9), (1600, -14.5), (3000, -22.5),
       (5000, -28.5), (7000, -28.5), (10000, -40.5), (14000, -38.5)]
# Its tones. Each row: pitch in Hz, level in dB.
HUM = [(82.6, -80.5), (143, -86)]


def ventilation():
    """Faint fan noise with two wavering tones, each a very narrow band of noise."""
    out = amp(-75.5) * unit(colour(rng.standard_normal(N), AIR))
    for hz, db in HUM:
        out += amp(db) * unit(resonate(rng.standard_normal(N), hz, width=1.0))
    return out


def scene():
    """The big blows fill the garage; wheels are heard mostly direct; heavy pushes start standing waves."""
    pushes, small, chirps = bumps(), small_blows(), judders()
    wheels = rolling() + rough_patches() + skids() + rasps()
    # the room gathers sound from all sides of the board, so the chatter evens out in the echo
    hits, knocks = strikes(small, rattle=0.18, in_echo=True)
    send = hits + amp(-3.0) * knocks + amp(-3.5) * pushes
    send = send + amp(-13.0) * wheels + amp(9.5) * chirps
    direct = sum(strikes(small, rattle=1, in_echo=False)) + pushes + slaps() + wheels + chirps
    room = standing_waves(pushes) + after_ring() + garage(send)
    return (direct + room + far_rolling() + ventilation())[None]


# the largest swing before the filters (full scale 1), the low cut and the upper band edge
CEILING, LOW_CUT_HZ, EDGE_HZ = 0.65, 35, 14300


def record(dry):
    """The treble rings in one band, the hardest peaks are rounded off, then both band ends are cut."""
    ringing_treble = dry + amp(4.0) * resonate(dry, 6320, width=480)
    rounded = CEILING * np.tanh(ringing_treble / CEILING)
    low_cut = signal.butter(2, LOW_CUT_HZ, "highpass", fs=SR, output="sos")
    band_limit = signal.firwin(255, EDGE_HZ, window=("kaiser", 9), fs=SR)
    return signal.oaconvolve(signal.sosfilt(low_cut, rounded), band_limit[None], "same")


dry = scene()
out = record(dry)
waveform_to_disk(out)
```